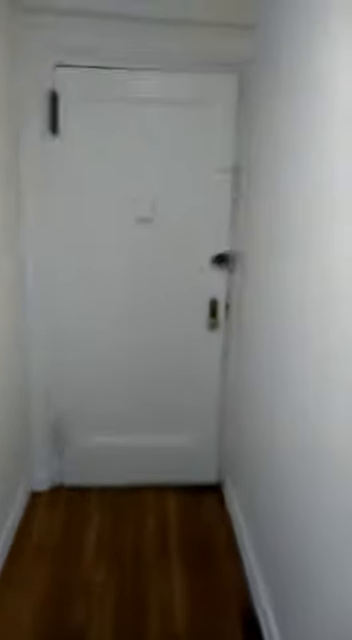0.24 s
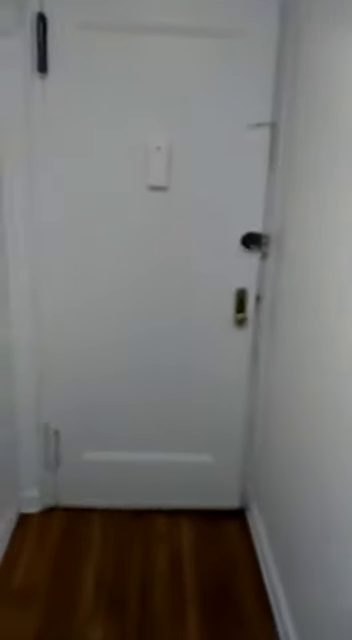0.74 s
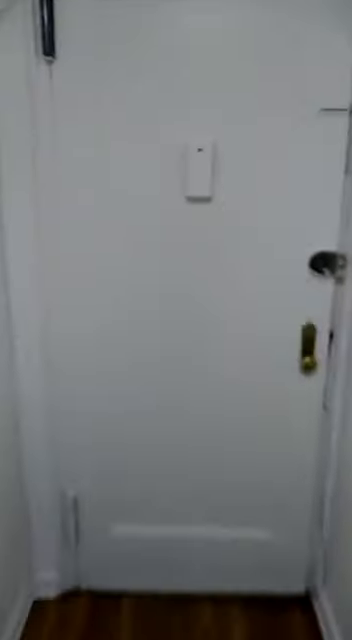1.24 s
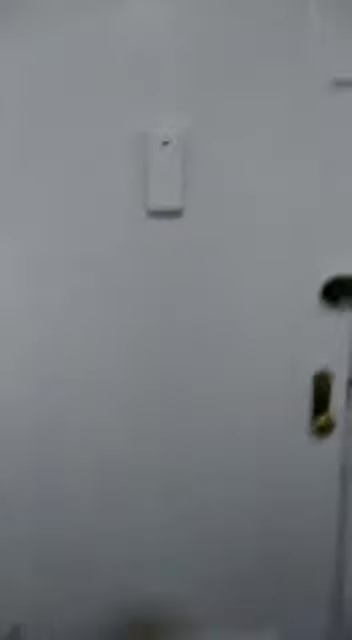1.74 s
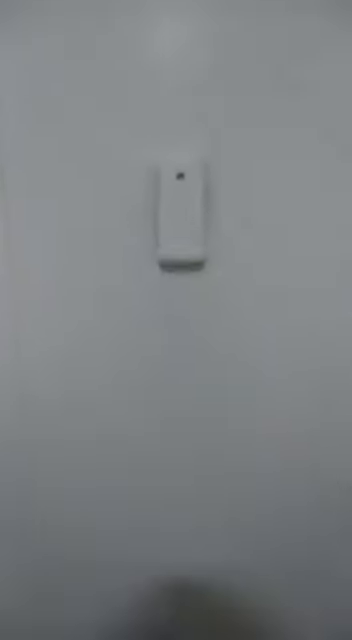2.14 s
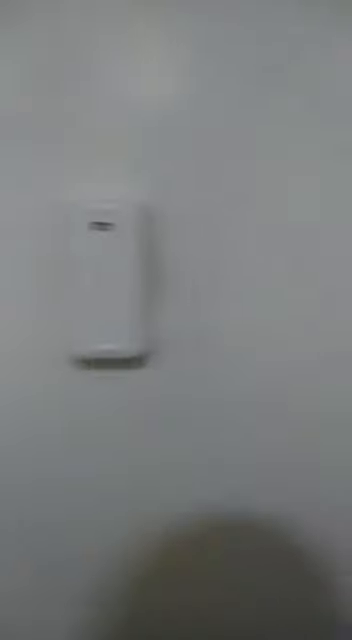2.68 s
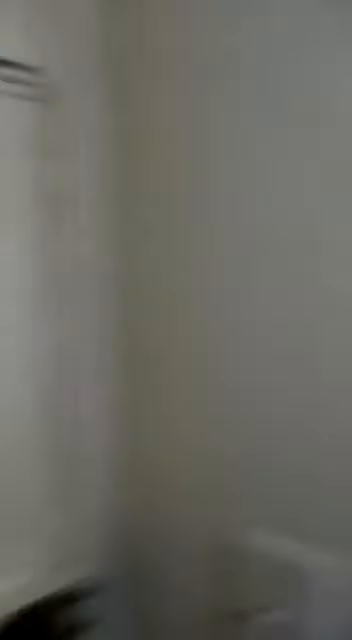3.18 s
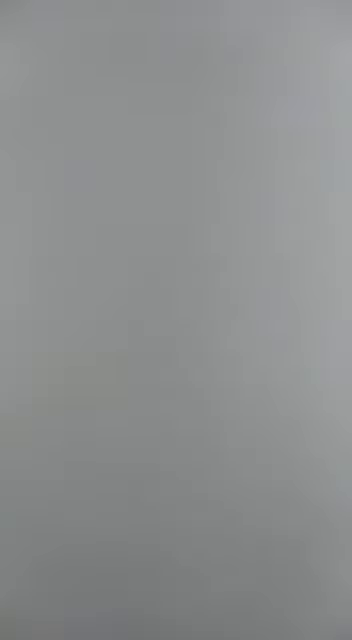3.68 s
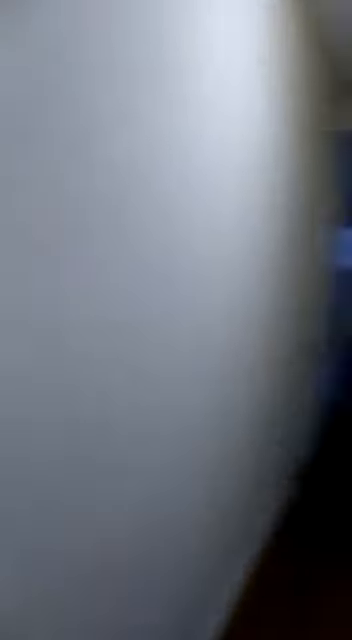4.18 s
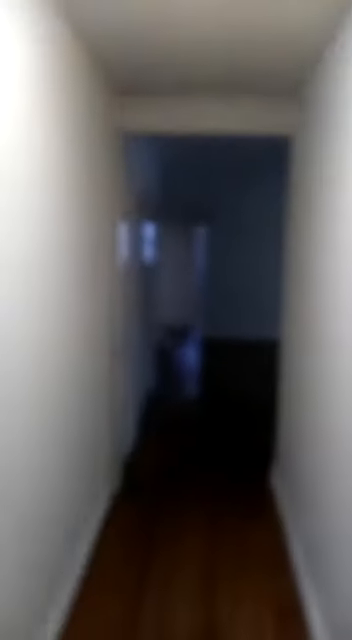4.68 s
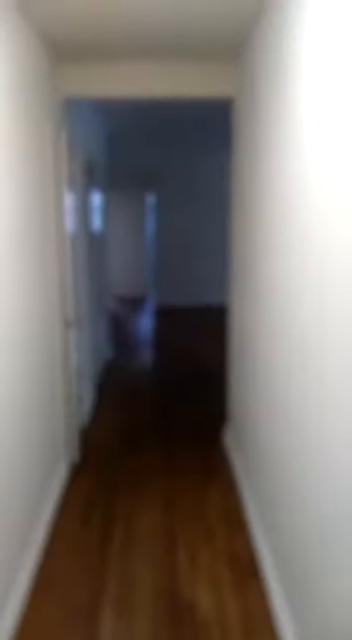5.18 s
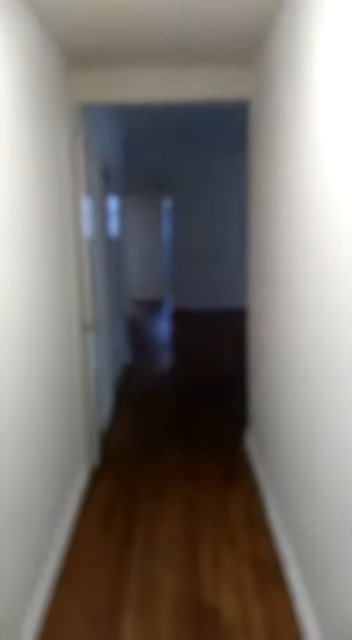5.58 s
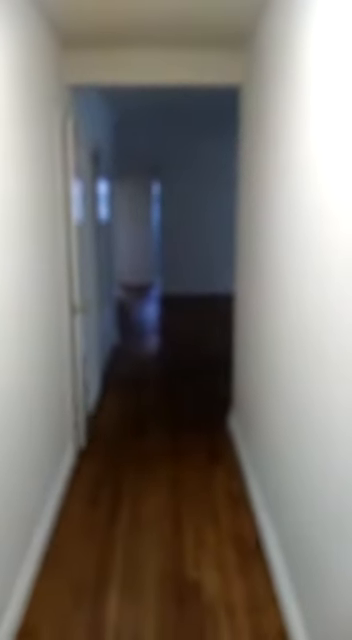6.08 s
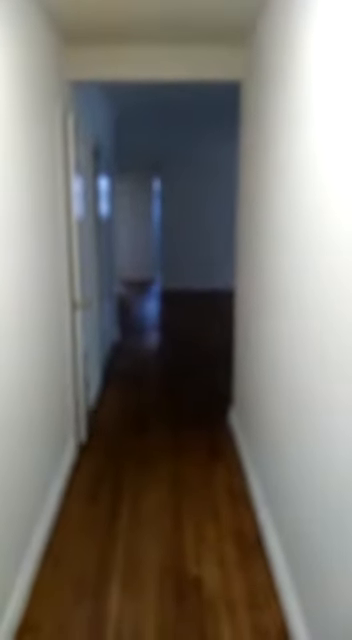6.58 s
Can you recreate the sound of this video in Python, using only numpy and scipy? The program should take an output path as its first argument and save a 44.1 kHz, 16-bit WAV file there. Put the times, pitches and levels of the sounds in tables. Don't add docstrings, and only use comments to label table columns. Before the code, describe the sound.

Close handheld capture in a narrow, empty hallway. Dull, boomy footsteps land on wooden boards, with gritty sole scuffs, dry cracks and light key jingles. The turning steps become softer and more rubbing, then stop. After near silence over a faint low rumble, a hard click and short finger scrapes lead to one piercing metal snap, followed by tiny ticks.

```python
import sys
import numpy as np
from scipy import signal
from scipy.io import wavfile
from scipy.ndimage import uniform_filter1d

SR = 44100
rng = np.random.default_rng(int(sys.argv[2]) if len(sys.argv) > 2 else 0)


def to_wav(s):
    ch = np.atleast_2d(s).T
    pcm = np.round(np.clip(ch, -1, 1) * 32767)
    wavfile.write(sys.argv[1], SR, pcm.astype(np.int16))


def gain_from_db(level_db):
    decades = np.asarray(level_db, float) / 20
    return 10 ** decades


N = 301070

# start [s], peak level [dB].
SNAP_HITS = [
    (6.0973, -30),
    (6.0993, -25),
    (6.1012, -1),
    (6.1032, -20),
    (6.1044, -19),
    (6.1058, -20),
    (6.1075, -16),
    (6.1092, -19),
]
PATCHY_DB = 2.5
SPREAD_DB = 2.5


def evened(x):
    return x / np.sqrt(np.mean(x ** 2) + 1e-20)


def peaked(x, db):
    return gain_from_db(db) * x / np.max(abs(x))


def read(points, hz):
    f, value = np.transpose(points)
    return np.interp(np.log(hz + 1), np.log(f + 1), value)


def add(mix, start_s, sound):
    part = mix[max(round(start_s * SR), 0):][:len(sound)]
    part += sound[:len(part)]


def band(x, lo_hz, hi_hz):
    return signal.sosfilt(signal.butter(4, [lo_hz, hi_hz], "band", fs=SR, output="sos"), x)


def resonate(x, hz, width_hz):
    b, a = signal.iirpeak(min(hz, .45 * SR), max(hz / width_hz, .3), SR)
    return signal.lfilter(b, a, x)


def resonate_twice(x, hz, width_hz):
    return resonate(resonate(x, hz, width_hz), hz, width_hz)


def noise(points, patchy_db, size=512):
    frames, hz = 4 * N // size + 5, np.fft.rfftfreq(size, 1 / SR)
    a, b, patches = rng.standard_normal((frames, len(hz), 3)).T
    patches = uniform_filter1d(patches, size=3, axis=0)
    patches = evened(uniform_filter1d(patches, size=30, axis=1))
    z = (a + 1j * b) * gain_from_db(read(points, hz)[:, None] + patchy_db * patches)
    return evened(signal.istft(z, nperseg=size, noverlap=3 * size // 4)[1][:N])


def swells(rows):
    roundness = 1.7
    rider_lasts = .8
    t = np.arange(0, N + 64, 64) / SR
    s, db, rise_ms, fade_ms, *above_db = np.transpose(rows)[:, :, None]
    curves = []
    for extra_db, lasts in zip((0, *above_db), (1, rider_lasts)):
        before = 1000 * (s - t) / abs(rise_ms)
        after = 1000 * (t - s) / abs(fade_ms * lasts)
        gain = gain_from_db(db + extra_db - 20 * np.maximum(before, after) ** roundness)
        curves.append(np.interp(np.arange(N) / SR, t, np.sqrt((gain ** 2).sum(0))))
    return np.array(curves)


def struck(modes, gains, long=1):
    t = np.arange(SR // 3) / SR
    return sum(g * gain_from_db(db - 60 * t / (t60 * long)) * np.sin(2 * np.pi * hz * t)
               for g, (hz, db, t60) in zip(gains, modes))


def bursts(rows, knock_db, edge_db):
    out, t = np.zeros(N), np.arange(1500) / SR
    for s, db, hz, above_db, ms in rows:
        knock = above_db if knock_db is None else knock_db
        edge = above_db if edge_db is None else edge_db
        burst = rng.standard_normal(1500) * (1 - np.exp(-t / 0.00005)) * np.exp(-1000 * t / max(ms, .3))
        add(out, s, peaked(band(resonate(burst, hz, 2300) + 0.31 * burst, 1750, 6220), db - 3.0))
        add(out, s, peaked(band(burst, 340, 1580), db + knock - 19.5))
        add(out, s, peaked(band(burst, 6700, 12000), db + edge - 9.0))
    return out


def rumble():
    # frequency [Hz], density [dB per Hz].
    wall_colour = [(12, -72), (27, -24), (41, -13.5), (64, -3.5), (108, -6), (129, -23), (145, -1),
                   (175, -31), (194, -40.5), (293, -51.5), (344, -38), (480, -64), (1060, -120)]
    waver = uniform_filter1d(rng.standard_normal((2, N)), size=2000)
    waver = evened(uniform_filter1d(waver, size=2000))
    hum_hz = 59.9 + 3.9 * waver[1]
    hum = gain_from_db(1.1 * waver[0]) * np.sin(2 * np.pi * np.cumsum(hum_hz) / SR)
    drone = resonate_twice(rng.standard_normal(N), 163.7, 23)
    walls = noise(wall_colour, 0.8, size=4096)
    return gain_from_db(-52) * evened(hum) + gain_from_db(-65.5) * evened(drone) + gain_from_db(-52.5) * walls


def hall(x):
    # frequency [Hz], t60 [s].
    decay = [(125, 0.92), (500, 0.12), (2000, 0.5), (5000, 0.52), (8000, 0.5), (14000, 0.45)]
    taps = np.zeros(SR)
    at = np.arange(200, SR - 20, 12) + rng.integers(0, 12, (SR - 209) // 12)
    taps[at] = rng.choice([-1., 1.], len(at))
    hz, t, z = signal.stft(taps, SR, nperseg=256)
    tail = signal.istft(z * gain_from_db(-60 * t / read(decay, hz)[:, None]), SR, nperseg=256)[1]
    return signal.fftconvolve(x, tail / np.linalg.norm(tail))[:N]


def streaks():
    # loudest moment [s], level [dB], 20 dB swell [ms], 20 dB fade [ms], pitch [Hz].
    rubs = [
        (2.59, -63, 93, 65, 2550),
        (2.9, -64, 40, 32, 2500),
        (2.415, -69.5, 49, 38, 6100),
        (3.41, -70, 94, 54, 1270),
        (3.4, -67.5, 128, 120, 2900),
        (3.5, -60.5, 207, 120, 4700),
        (3.3, -75.5, 155, 154, 4650),
        (4.3, -71, 100, 90, 4000),
        (2.9, -72, 60, 60, 2300),
    ]
    width_hz = 220
    rub = rng.standard_normal(N)
    return sum(swells([row])[0] * evened(resonate_twice(rub, hz, width_hz)) for *row, hz in rubs)


def scuffs():
    # frequency [Hz], density [dB per Hz].
    grit_colour = [(1060, -34), (1800, -35), (2430, -7.5), (3380, -4), (4740, -1), (6270, -11.5),
                   (7290, -19), (7890, -28), (10000, -44), (14000, -80)]
    cloth_colour = [(850, -41), (1080, 1.5), (1300, 6), (1700, 2), (2200, 1.5), (2900, -36)]
    drag_colour = [(500, -40), (650, -3), (800, 0), (980, -2), (1250, -35)]
    scrape_colour = [(1120, -48.5), (1900, -25), (2370, 3.5), (3090, -6), (4470, -2), (5860, -8),
                     (6970, -25.5), (7470, -23.5), (10000, -23), (14000, -78.5)]
    # fastest moment [s], grit level [dB], 20 dB swell [ms], 20 dB fade [ms],
    # cloth rustle above the grit [dB].
    strokes = [(0.02, -50.5, 75, 444, -2), (0.31, -76, 68, 102, 19.5), (0.5, -52, 259, 427, -11.5),
               (0.73, -49, 6, 362, 4.5), (1.05, -57, 297, 222, -13), (1.19, -53, 20.5, 297, 2),
               (1.33, -50.5, 150, 348, -2), (1.62, -58, 239, 148, -17), (1.754, -50, 13, 138, -10),
               (1.842, -52.5, 9.5, 446, 0), (2.13, -59.5, 200, 163, -4), (2.5, -63, 337, 225, -42),
               (2.667, -59, 8, 162, 4.5), (2.76, -56.5, 91, 111, -3), (2.805, -67, 15, 325, 8),
               (3.05, -57.5, 235, 248, -18), (3.468, -57.5, 13, 308, 1.5), (3.74, -66, 127, 219, -9.5),
               (4.01, -49, 102, 294, -4), (4.16, -73.5, 125, 210, 9)]
    # moment [s], level [dB], 20 dB
    # swell [ms], 20 dB fade [ms].
    drags = [(0.002, -38, 18, 17), (0.1, -52, 82, 190), (0.31, -52, 76, 136), (0.735, -50, 132, 296.5),
             (1.19, -51.5, 19, 403), (1.84, -60, 4, 389), (2.11, -54.5, 66, 148), (2.803, -53, 18, 274),
             (3.29, -68, 13, 87), (3.815, -71, 42, 46), (4.02, -58.5, 75, 207), (5.47, -65.5, 34, 32),
             (0.5, -65, 83, 100)]
    # moment [s], scrape level [dB], 20 dB swell [ms],
    # 20 dB fade [ms], cloth rustle above the scrape [dB].
    slides = [
        (5.288, -47.5, 5, 173, -10.5),
        (5.468, -38.5, 52.5, 34, -5),
        (5.5, -57.5, 17, 123, -5.5),
        (5.648, -38.5, 35.5, 13, -50),
        (5.665, -58, 13, 129, -26),
        (6.075, -58, 70.5, 38, -39),
        (6.13, -54.5, 27, 191, -17.5),
        (6.683, -68, -2, 90, -31),
    ]
    lumps = evened(uniform_filter1d(rng.standard_normal(N), size=200))
    grit, cloth, drag, scrape = (noise(colour, PATCHY_DB)
                                 for colour in (grit_colour, cloth_colour, drag_colour, scrape_colour))
    soles = (swells(strokes) * [grit, cloth]).sum(0) + swells(drags)[0] * drag
    fingers = (swells(slides) * [scrape, cloth]).sum(0)
    return gain_from_db(1.3 * lumps) * soles + gain_from_db(PATCHY_DB * lumps - 7.5) * fingers


def boards():
    # moment [s], level [dB], 20 dB swell [ms],
    # 20 dB fade [ms], creak of the thinner boards above it [dB].
    weight = [(0.002, -4.5, 16, 9.5, -58), (0.02, -36.5, 22, 335, -6), (0.4, -60.5, 168, 244, 2),
              (0.6, -32, 49, 117, -21), (0.7, -26, 43, 60, -21), (0.75, -39.5, 48, 316.5, -4.5),
              (1.08, -57, 141, 100, -12), (1.19, -27.5, 23, 142, -12.5), (1.31, -36.5, 118, 340, -7),
              (1.858, -21, 21, 51, -17.5), (1.97, -36, 108, 319, -9.5), (2.71, -34.5, 62, 123, -14.5),
              (2.81, -26, 46, 200, -15.5), (3.05, -44.5, 210, 311, -20), (3.46, -33.5, 39, 290, -16),
              (3.65, -35.5, 68, 68, -44), (3.75, -42.5, 124, 143, -22.5), (4.08, -44, 133, 118, -16.5),
              (4.32, -46, 117, 58, -31), (4.42, -60, 20, 108, -17)]
    # frequency [Hz], width [Hz], level [dB].
    floor_modes = [(68, 20, -9), (95, 25, -8), (142, 28, 0), (200, 35, -8), (270, 60, -13), (345, 40, -11),
                   (425, 70, -15), (530, 90, -31)]
    # start [s], peak level [dB], pitch [Hz], t60 [s].
    thuds = [(0.004, -19, 108, 0.028), (0.081, -19.5, 101, 0.044), (0.593, -36.5, 172, 0.29),
             (0.679, -49, 106, 0.3), (1.177, -20.5, 136, 0.11), (1.287, -23.5, 145, 0.39),
             (1.836, -19.5, 136.6, 0.34), (1.955, -26, 151.5, 0.21), (2.103, -23.5, 164, 0.018),
             (2.529, -40, 206.4, 0.14), (2.799, -15, 170.7, 0.07), (3.204, -38.5, 145, 0.17),
             (3.428, -26, 128.4, 0.37), (3.644, -19, 166.2, 0.11), (4.285, -37, 137.5, 0.17),
             (5.055, -40, 244, 0.055)]
    load, creak = swells(weight)
    shake = rng.standard_normal(N)
    modes = [gain_from_db(db) * resonate_twice(shake, hz, width_hz) / np.sqrt(width_hz)
             for hz, width_hz, db in floor_modes]
    out = gain_from_db(-7.0) * evened(sum(modes[:4])) * load + evened(sum(modes[4:])) * creak
    t = np.arange(SR // 2) / SR
    for s, db, hz, t60 in thuds:
        blow = (1 - np.exp(-t / 0.0079)) * gain_from_db(-60 * t / t60)
        tone = np.sin(2 * np.pi * hz * t)
        tone += 0.38 * np.sin(2 * np.pi * 1.45 * hz * t) * gain_from_db(-150 * t)
        tone += 0.13 * np.sin(2 * np.pi * 345 * t) + 0.58 * np.sin(2 * np.pi * 68 * t)
        add(out, s - .004, peaked(blow * tone, db - 4.5))
    return band(out, 30, 730)


def cracks():
    # start [s], peak level [dB], centre [Hz], woody knock above it [dB], length [ms].
    crack_rows = [(0.0476, -30.5, 5150, -10, 5), (0.061, -34, 4260, -4, 9.1), (0.728, -20, 3800, 12.5, 2.3),
                  (0.7389, -30.5, 2950, 16.5, 4.2), (0.747, -36.5, 4800, 16, 5),
                  (0.7542, -36, 4500, 14, 4.3), (1.1869, -26.5, 5300, 12.5, 1.3),
                  (1.7508, -27, 2600, -37, 5.9), (1.8396, -32.5, 3930, -28, 5),
                  (2.0113, -35, 3370, -5, 7.3), (2.1016, -43, 4950, 15, 1.7),
                  (2.6644, -31.5, 4320, -35, 3.7), (2.797, -32, 4120, 22, 6.2),
                  (2.8691, -24.5, 4150, -46, 3.5), (2.9995, -33, 4060, -37, 4.6),
                  (3.05, -32, 4740, -48, 4.4), (3.463, -25.5, 4160, -35, 4.8), (3.527, -29, 3120, -34, 4.5)]
    return bursts(crack_rows, None, -52)


def knocks():
    # start [s], peak level [dB], centre [Hz].
    knock_rows = [
        (0.304, -41, 1150),
        (1.282, -32.5, 1440),
        (0.082, -37, 935),
        (2.101, -39.5, 610),
        (3.287, -47, 940),
        (3.807, -51, 1046),
        (4.407, -48, 530),
        (5.055, -56.5, 510),
        (5.279, -48, 805),
        (6.678, -61.5, 774),
    ]
    out, t = np.zeros(N), np.arange(1500) / SR
    for s, db, hz in knock_rows:
        burst = rng.standard_normal(1500) * np.exp(-t / 0.013)
        add(out, s, peaked(resonate_twice(burst, hz, 0.52 * hz), db - 0.5))
    return out


def clicks():
    # start [s], peak level [dB], centre [Hz], sharp edge above it [dB], length [ms].
    click_rows = [
        (0.84, -23, 4170, -6.5, 0.63),
        (5.2617, -43, 3140, -13, 18),
        (5.278, -23.5, 3070, -19, 2.2),
        (5.2824, -17, 2130, -21, 1.02),
        (6.238, -39.5, 6200, 4, 3.6),
        (2.4523, -42, 6300, -12, 1.7),
        (6.2508, -40, 6000, 8, 1.4),
    ]
    return bursts(click_rows, -12, None)


def keys():
    # frequency [Hz], level [dB], t60 [s].
    key_modes = [(2560, -12, .12), (3560, -16, .1), (5005, -1, .16), (5780, -4, .2), (6720, -6, .07),
                 (7500, -5, .08), (8050, -8, .08), (10600, -3, .12), (12000, -6, .08), (12680, -4, .12),
                 (13700, -1, .15), (14600, -8, .1)]
    # start [s],
    # peak level [dB], loudest mode [Hz], other modes [dB], ring length [factor].
    ticks = [
        (0.5794, -41, 3970, 13, 1),
        (1.0345, -42, 2630, -29, 0.31),
        (1.1964, -37.5, 4880, 11, 0.8),
        (1.525, -33.5, 5780, -15, 0.82),
        (2.0594, -45.5, 5000, 13, 0.6),
        (2.1685, -37.5, 5740, -19, 0.098),
        (2.177, -39, 4230, 6, 1),
        (2.5132, -40.5, 7100, -10, 0.9),
        (3.0883, -38.5, 4930, 1, 0.51),
    ]
    jingles = [(0.394, -30, 5550, -5, 0.47), (0.428, -30.5, 6960, -11, 0.22),
               (0.4332, -35, 6600, -14, 0.15), (1.6697, -33, 5620, -9, 0.31), (1.6816, -37.5, 5760, 5, 1),
               (1.716, -30, 5430, 0, 1), (2.383, -58, 4970, 2, 0.71), (2.4523, -32.5, 4650, 5, 1),
               (5.0564, -54.5, 3660, -17, 0.34), (5.2274, -60.5, 4560, -20, 0.96),
               (6.6224, -50.5, 8050, -32, 0.35), (6.7067, -47.5, 8120, -31, 0.14)]
    out, t = np.zeros(N), np.arange(300) / SR
    upper = np.transpose(key_modes)[0] > 9500
    rows = [(*row, -33) for row in ticks] + [(*row, -14) for row in jingles]
    for s, db, hz, other_db, long, upper_db in rows:
        chance_db = SPREAD_DB * rng.standard_normal(len(key_modes))
        gains = gain_from_db(chance_db + np.where(upper, upper_db, other_db))
        scrape = rng.standard_normal(300) * np.exp(-t / 0.0017)
        modes = struck(key_modes + [(hz, 0, .12)], [*gains, 1], max(long, .1))
        ring = peaked(np.convolve(modes, scrape), 0)
        ring[:300] += peaked(band(scrape, 3000, 8500), 3)
        add(out, s, peaked(band(ring, 2400, 16000), db - 2.5))
    return out


def slips():
    # start [s], peak level [dB], pitch [Hz], length [ms].
    slip_rows = [(5.6162, -51.5, 2700, 2), (5.607, -55.5, 7600, 4), (5.9961, -58, 5550, 6),
                 (5.999, -62, 4500, 8), (5.997, -64.5, 8200, 3), (6.0257, -51.5, 3670, 3),
                 (6.0268, -51, 5600, 3), (6.027, -59.5, 2700, 4), (6.0377, -51, 3800, 2),
                 (6.0415, -51, 3900, 3), (6.043, -53.5, 5500, 3), (6.0487, -45, 3800, 1.5),
                 (6.048, -48.5, 7400, 4), (6.054, -49, 3800, 1), (6.0563, -42.5, 5690, 2),
                 (6.0576, -46, 7500, 2), (6.0602, -47.5, 3900, 1.5), (6.068, -40.5, 5700, 1.5),
                 (6.0683, -46.5, 7800, 3), (6.0688, -53, 10800, 2), (6.071, -52, 2700, 5),
                 (6.0714, -44, 3870, 2), (6.0742, -44.5, 5800, 2), (6.0793, -47, 3900, 1.5),
                 (6.083, -40, 3800, 2), (6.0967, -26, 7600, 1.5), (6.097, -33.5, 11300, 2),
                 (6.1081, -23, 7600, 1), (6.048, -55.5, 11500, 8.6), (6.058, -55, 9970, 3),
                 (0.84, -55, 8940, 34), (0.729, -53, 8640, 8.9), (6.1873, -50, 6800, 1),
                 (6.2123, -43, 8200, 1), (6.24, -32, 7730, 2), (6.239, -46, 11700, 6),
                 (6.238, -49, 15700, 3), (6.2515, -51, 11700, 4), (6.2515, -40, 6200, 1.5),
                 (6.3079, -46, 6030, 1.5), (6.679, -52.5, 4377, 4), (6.6776, -51.5, 3305, 8),
                 (6.6785, -54.5, 6568, 4), (6.6787, -53.5, 9300, 3), (6.706, -60, 3300, 3)]
    sharpness = 7
    out, t = np.zeros(N), np.arange(1500) / SR
    for s, db, hz, ms in slip_rows:
        puff = rng.standard_normal(1500) * np.exp(-1000 * t / max(ms, .3))
        add(out, s, peaked(resonate_twice(puff, hz, hz / sharpness), db))
    return out


def clap():
    out, t = np.zeros(N), np.arange(600) / SR
    burst = rng.standard_normal(600) * np.exp(-t / 0.0029)
    add(out, SNAP_HITS[2][0], gain_from_db(-27.5) * band(burst, 2300, 8600) + gain_from_db(-36.5) * band(burst, 7000, 15500))
    return out


def snap():
    # frequency [Hz], level [dB], t60 [s].
    ring_modes = [(2450, -18, .006), (3600, 4, .005), (4285, -5, .012), (5600, -5, .014), (6400, -5, .018),
                  (7488, -17, .035), (9200, -25, .008), (11280, -19, .008), (12720, -29, .07),
                  (15710, -26, .05)]
    # start [s], frequency [Hz], level [dB], t60 [s].
    swinging = [
        (6.1085, 7500, -24.5, 0.072),
        (6.1085, 12720, -32.5, 0.1),
        (6.12, 15710, -35, 0.12),
        (6.128, 5015, -43, .16),
        (6.128, 5017, -56.5, 0.88),
        (6.135, 10050, -50, 0.11),
        (6.15, 7600, -47, 0.056),
        (6.305, 5017, -76, 0.26),
        (2.5135, 2546, -39.5, 0.037),
    ]
    out, t = np.zeros(N), np.arange(300) / SR
    for s, db in SNAP_HITS:
        gains = gain_from_db(SPREAD_DB / 2 * rng.standard_normal(len(ring_modes)))
        ring = peaked(struck(ring_modes, gains), 0)
        rattle = rng.standard_normal(300) * np.exp(-t / .002)
        ring[:300] += gain_from_db(-12) * band(rattle, 2200, 10000)
        ring = band(band(ring, 1950, 16600), 1950, 16600)
        add(out, s, peaked(ring, db))
        add(out, s, gain_from_db(db - 35.0) * np.exp(-t / 0.00061))
    onset = 1 - np.exp(-np.arange(SR // 3) / SR / .005)
    for s, *mode in swinging:
        add(out, s, struck([mode], [1]) * onset)
    return out


def scene():
    steps, metal, shut = boards(), keys() + slips(), snap()
    taps, hand = cracks() + knocks(), clicks()
    sent = gain_from_db(-9.5) * steps + gain_from_db(-.5) * taps + gain_from_db(-15) * hand + gain_from_db(-13) * metal + gain_from_db(-29.5) * shut
    wet = hall(sent + clap())
    return (steps + taps + hand + metal + shut + wet + scuffs() + streaks() + rumble())[None]


def low_pass(x):
    return signal.sosfilt(signal.butter(12, 16870, fs=SR, output="sos"), x)


def record(dry):
    # frequency [Hz], width [Hz], level [dB].
    cavity = [(4880, 600, -10.5), (2990, 67, -10.5), (1204, 200, -13)]
    # frequency [Hz], opening level [dB].
    opening = [(150, -95), (260, -80.5), (1000, -70.5), (3000, -68.5), (4200, -67.5), (4750, -79),
               (5300, -69), (8500, -63.5), (16000, -68)]
    # frequency [Hz], density [dB per Hz].
    hiss_colour = [(240, -16), (400, 0.5), (505, -18), (648, -12), (831, -15.5), (3370, -19), (15000, -22),
                   (16500, -32.5)]
    x = dry[0] + sum(gain_from_db(db) * resonate(dry[0], hz, width_hz) for hz, width_hz, db in cavity)
    hz, t, z = signal.stft(x, SR, nperseg=256, noverlap=192)
    power = uniform_filter1d(abs(z) ** 2, size=12, axis=1, origin=4)
    over_db = 10 * np.log10(abs(power) + 1e-14) - read(opening, hz)[:, None] + 12
    ragged = rng.standard_normal(z.shape[::-1]).T
    over_db += 4.5 * evened(uniform_filter1d(ragged, size=200, axis=1))
    fall_db = 260 * t
    gain_db = np.clip(7.5 * over_db, -32, 0)
    gain_db = np.maximum.accumulate(gain_db + fall_db, axis=1) - fall_db
    gated = signal.istft(z * gain_from_db(gain_db), SR, nperseg=256, noverlap=192)[1][:N]
    hiss = gain_from_db(-78) * noise(hiss_colour, 0.61)
    return low_pass((gated + hiss)[None])


dry = scene()
out = record(dry)
to_wav(out)
```